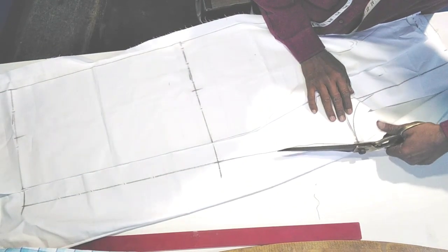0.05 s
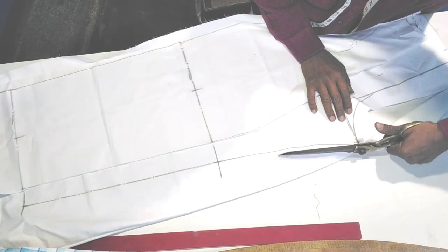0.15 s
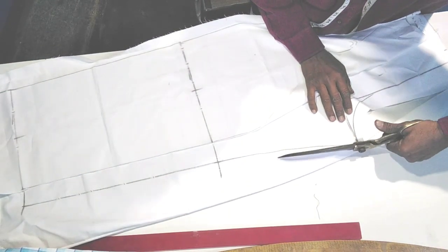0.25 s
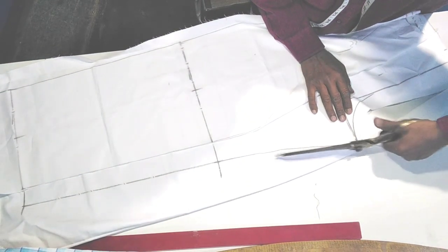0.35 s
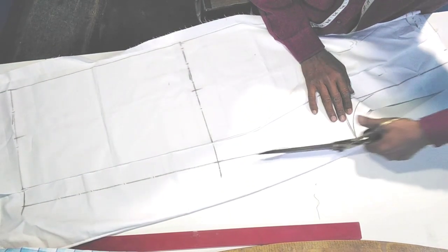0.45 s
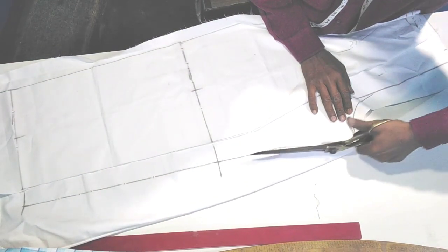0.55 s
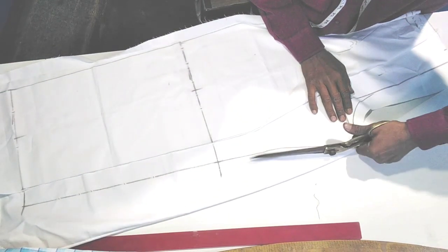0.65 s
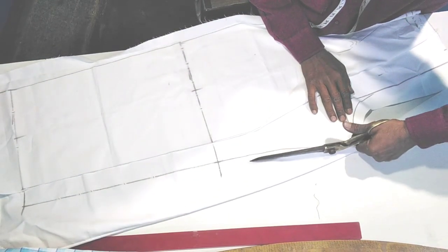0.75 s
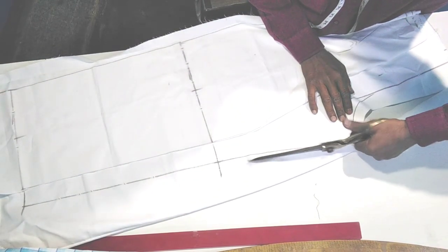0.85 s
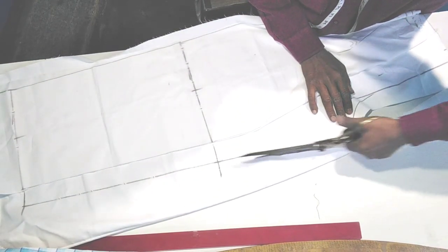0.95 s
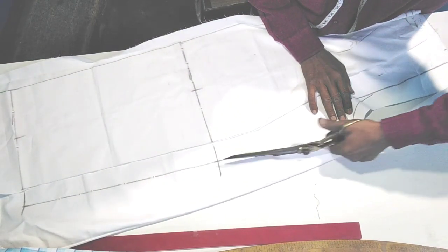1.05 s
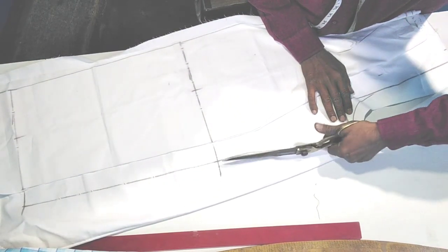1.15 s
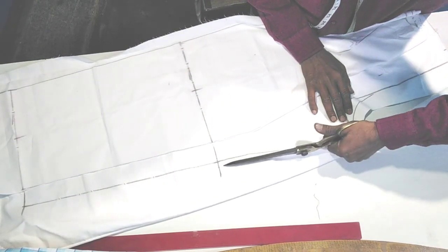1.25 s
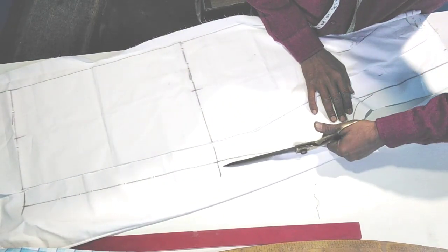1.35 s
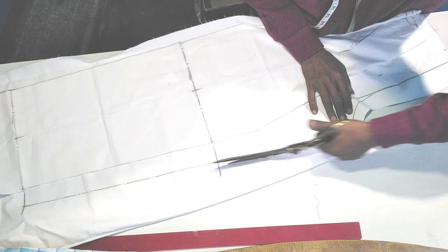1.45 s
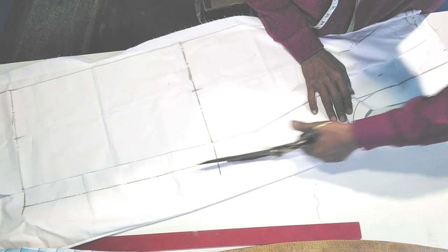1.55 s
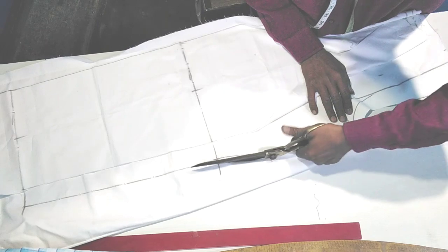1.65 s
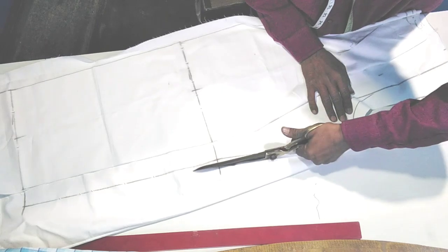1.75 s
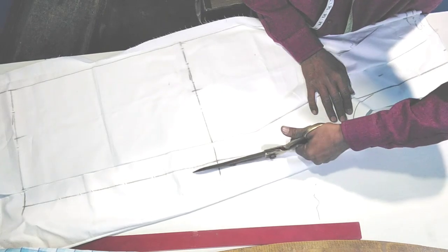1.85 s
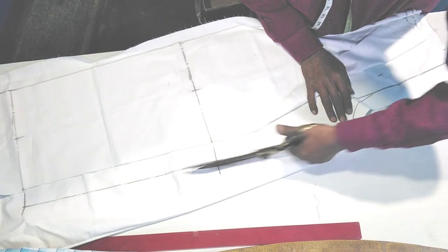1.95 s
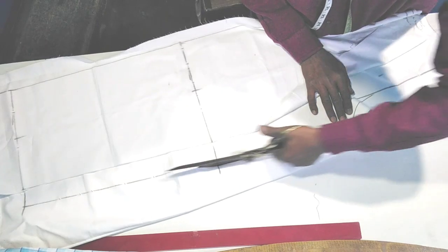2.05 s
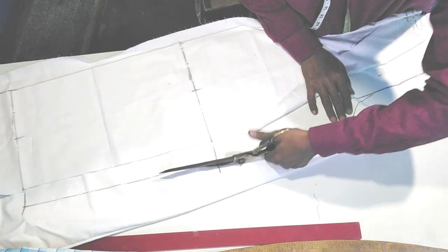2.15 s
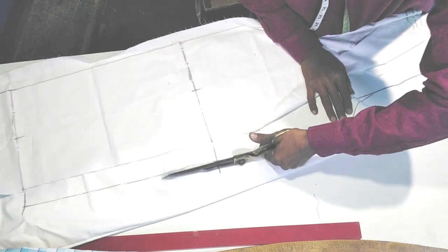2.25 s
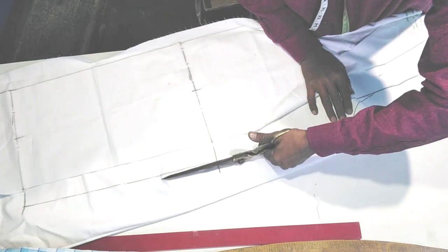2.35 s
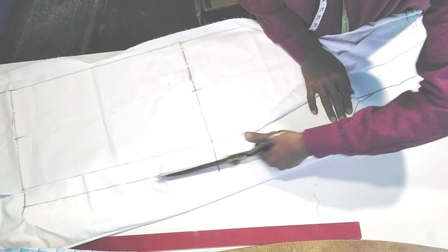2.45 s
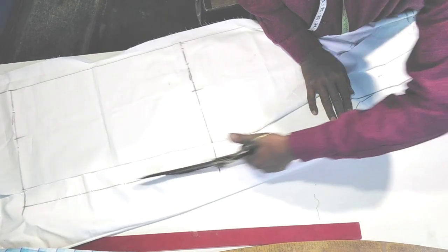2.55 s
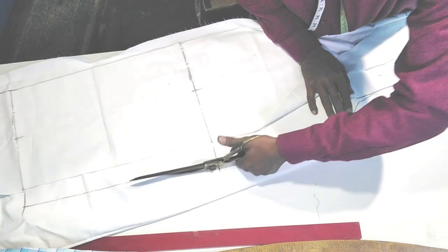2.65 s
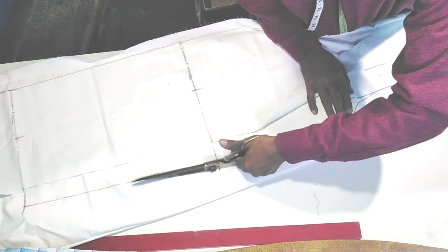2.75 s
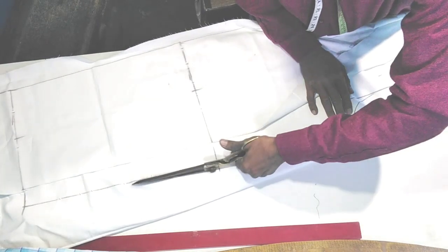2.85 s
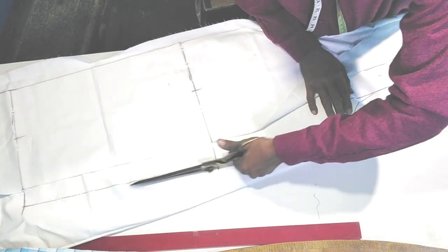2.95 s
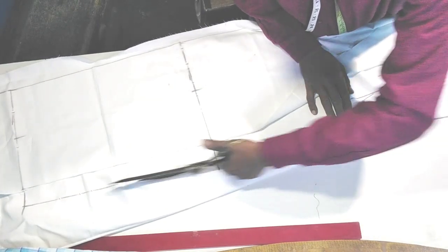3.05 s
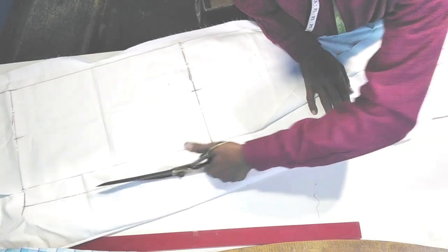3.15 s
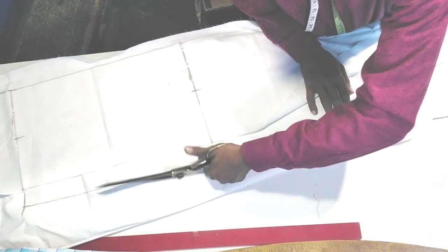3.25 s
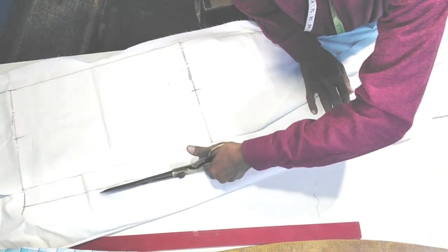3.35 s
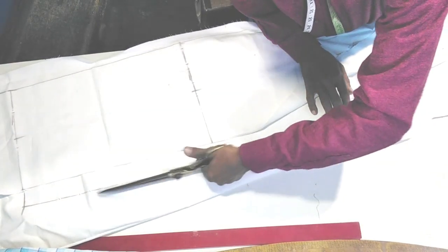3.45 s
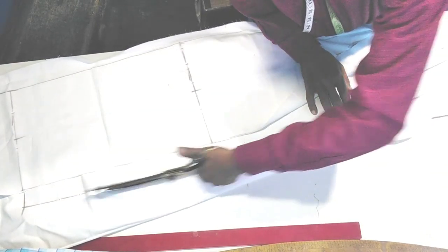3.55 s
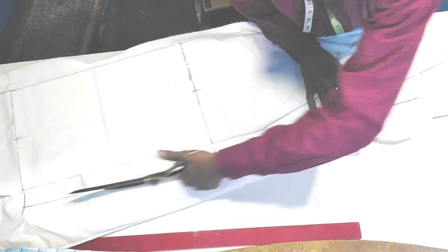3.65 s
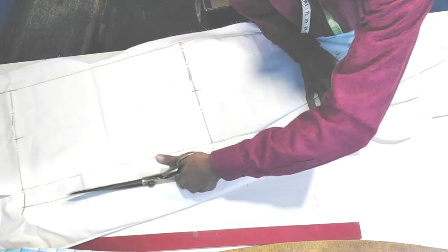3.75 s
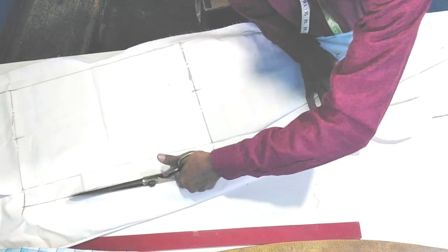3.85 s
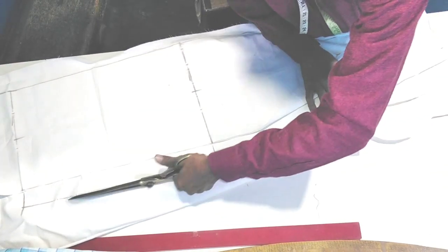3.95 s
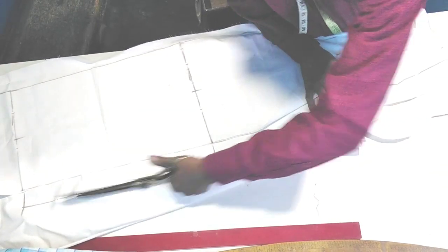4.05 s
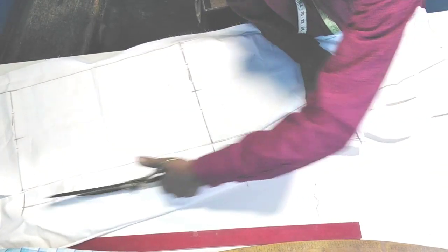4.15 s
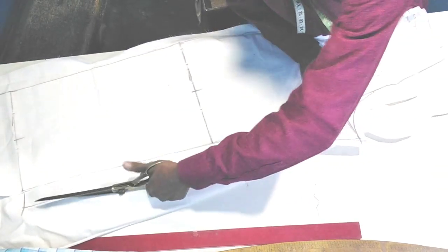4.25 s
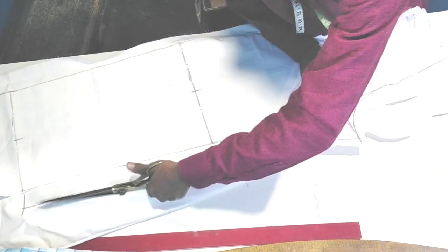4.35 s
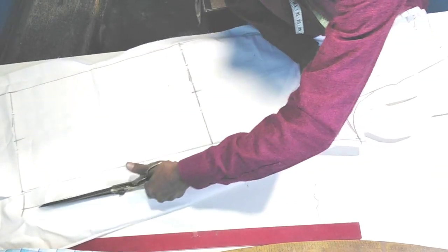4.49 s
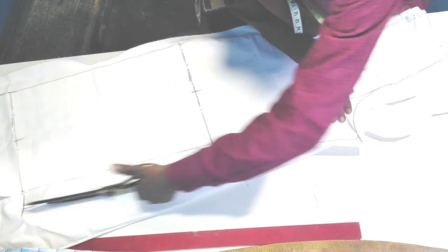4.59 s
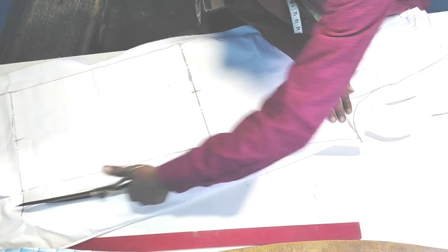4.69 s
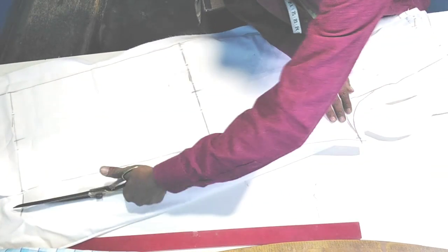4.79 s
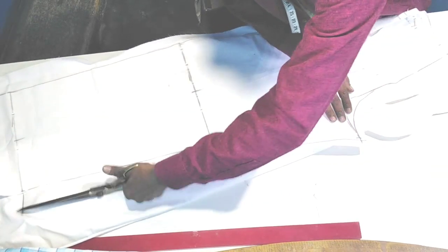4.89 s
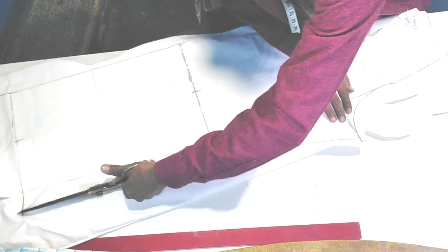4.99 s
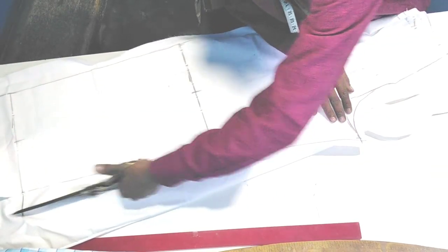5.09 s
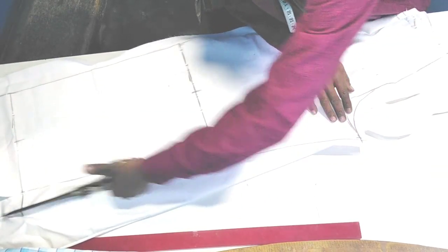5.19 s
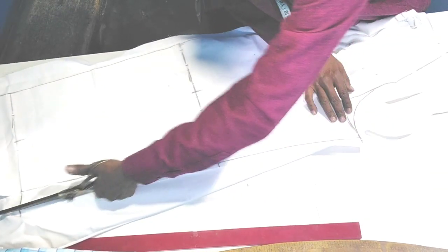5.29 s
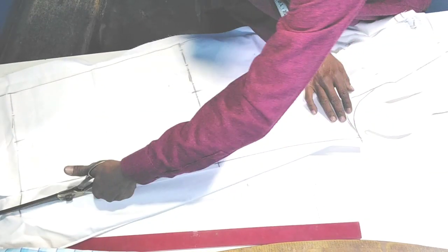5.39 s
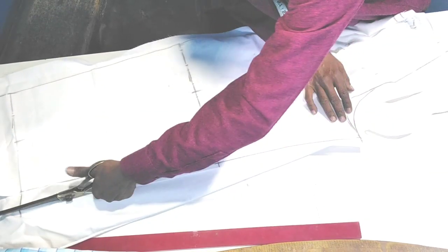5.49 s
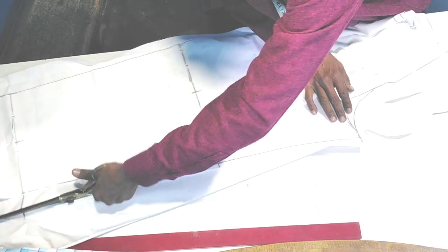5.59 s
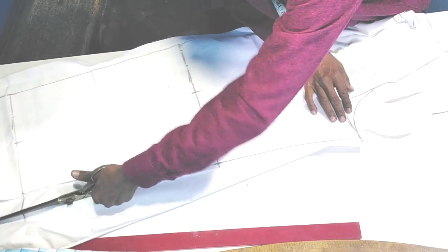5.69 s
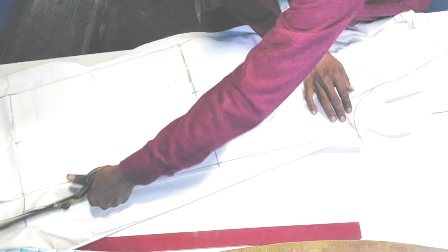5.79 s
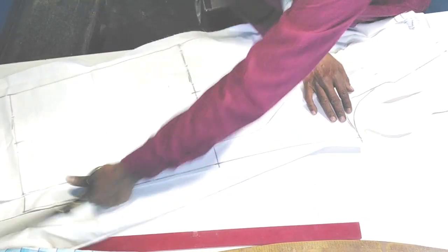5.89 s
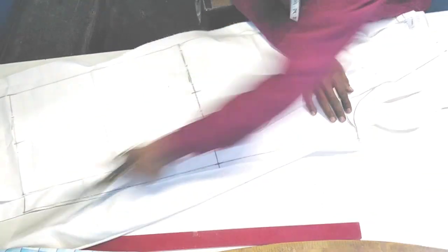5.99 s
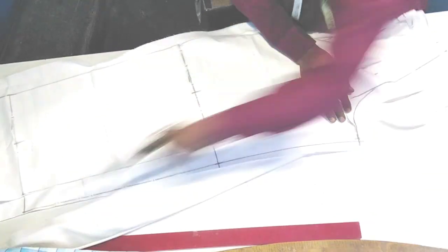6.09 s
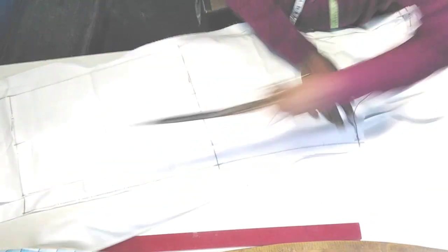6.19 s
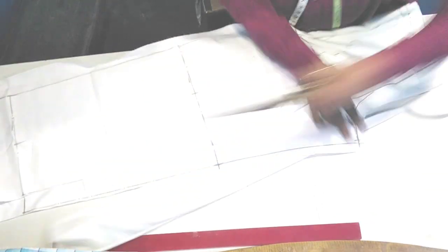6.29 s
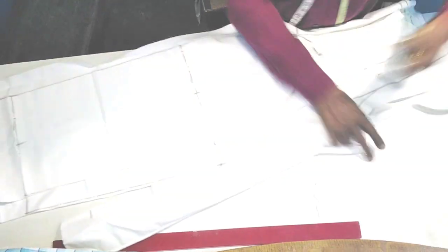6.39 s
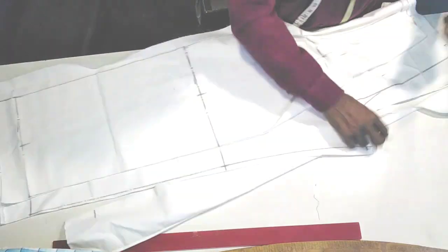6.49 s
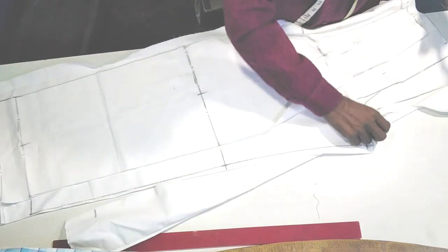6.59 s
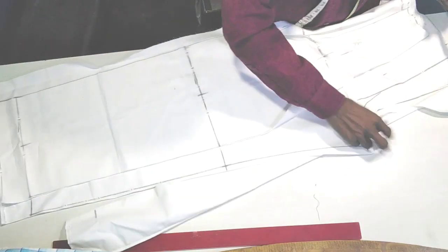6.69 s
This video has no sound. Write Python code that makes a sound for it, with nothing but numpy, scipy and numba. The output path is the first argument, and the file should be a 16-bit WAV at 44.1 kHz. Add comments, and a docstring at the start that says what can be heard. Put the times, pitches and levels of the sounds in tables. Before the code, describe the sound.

A steady low table hum and faint electrical whine lie under regular scissor strokes: knock, grinding crunch through fabric, steel click, opening scrape. The strokes resonate in the tabletop, heard from close by with a short dull room tail. Near the end a longer pause leads to a last snip, a loud double clack and skid, then swishing cloth and small metal ticks.

```python
"""Throughout, air murmurs, a lamp driver whines and ticks with the mains, a table hums and cloth rustles.
Large steel shears cut the cloth about twice a second: grains of noise, as of parting threads, excite
resonances of blades and table; knocks ring the table modes, tips clash and the blades scrape open.
At last the shears land hard, skid and leave the pivot ringing; they are drawn away as the rustle swells.
The sources are filtered noise, decaying modes and wavering sines; the shears also excite a short room tail."""
import sys
import numpy as np
from scipy import signal
from scipy.fft import rfft, irfft
from scipy.io import wavfile
from scipy.ndimage import uniform_filter1d
from numba import njit

SR = 44100
rng = np.random.default_rng(int(sys.argv[2]) if len(sys.argv) > 2 else 0)


def output_pcm(signal):
    """Save a mono or channel-first signal as 16-bit PCM at the path in sys.argv[1].

    Samples are clipped to [-1, 1] before scaling.
    """
    pcm = np.clip(np.atleast_2d(signal).T, -1, 1) * 32767
    wavfile.write(sys.argv[1], SR, np.round(pcm).astype(np.int16))


N = 296793
T = np.arange(N) / SR

# spectrum of the air, relative: [f/Hz, level/dB]
AIR_SPECTRUM = [(18, -33), (30, 0.5), (73, 3), (389, -14.5), (492, -34.5), (874, -17), (1080, -26),
                (1640, -29.5), (3230, -36.5), (9190, -107), (11900, -51), (14000, -34), (15500, -37)]
AIR_DB = -38.5  # mean rms level
# steady tones of the lamp driver: [f/Hz, level/dB]
WHINE = [(12726, -76), (12828, -80), (14228, -66), (14298, -82), (14330, -61.5), (14400, -74), (14433, -78),
         (14530, -74), (14632, -77), (14992, -69), (15106, -69), (15202, -65), (15289, -82), (15477, -75)]
MAINS_HZ, FIRST_TICK_S, TICK_DB = 49.945, 0.00529, -40
# lowest tone of the table, throughout: [t/s, f/Hz, level/dB]
HUM = [(0.0, 59.9, -24), (0.45, 60, -28.5), (0.51, 60.5, -39), (0.62, 61, -28), (0.8, 59.1, -29),
       (0.96, 58.5, -23), (1.42, 58.4, -31.5), (1.76, 61.1, -24), (1.97, 59.3, -47), (2.17, 59.3, -23.5),
       (2.74, 61, -35.5), (2.83, 59.6, -32), (3.71, 59.9, -27), (5.19, 60.4, -35.5), (5.45, 61.3, -36),
       (5.57, 62.9, -19), (5.62, 61.5, -28), (5.66, 61.7, -27), (5.77, 56.0, -30), (6.24, 54.4, -48),
       (6.35, 58.8, -37), (6.73, 58.6, -50)]
# swells of the two long modes above it: [peak t/s, second mode level/dB, third mode level/dB]
BOOM = [(0.2, -23.5, -28.5), (0.66, -24.5, -21.5), (1.201, -20, -26.5), (1.7, -26, -23), (2.25, -24.5, -31),
        (2.7, -23.5, -32), (3.3, -29.5, -45), (3.8, -24, -29.5), (4.36, -28, -36.5), (4.8, -28, -29),
        (5.34, -36.5, -43), (5.55, -29, -27), (5.67, -23, -23.5), (6.35, -35, -41.5)]
# those two modes: [f/Hz]
BOOM_HZ = 102.1, 154.9
SWELL_DB_PER_S, FADE_DB_PER_S, HALF_PLATEAU_S = 287, 81.5, 0.033
# cloth sliding: [t/s, fine hiss level/dB, swish level/dB, low rub level/dB, swish centre f/Hz]
RUSTLE = [(0.0, -59, -55, -49.5, 1500), (1.5, -57, -59, -51, 1550), (2.9, -57, -55, -61, 1550),
          (4.9, -59, -57.5, -52, 1370), (5.0, -61, -64, -78, 1503), (5.07, -63, -48, -49, 1900),
          (5.19, -53.5, -46.5, -50.5, 1830), (5.4, -68, -65, -82, 1624), (5.6, -66, -47, -52, 2500),
          (5.74, -55, -47, -50, 1400), (5.829, -58, -34.5, -39.5, 2800), (5.86, -59, -43.5, -44, 2430),
          (5.918, -50, -49.5, -48, 1432), (5.99, -45.5, -42.5, -44.5, 1290), (6.026, -43, -38.5, -44, 1230),
          (6.07, -44, -43, -50, 1304), (6.11, -45, -46, -49, 1900), (6.135, -48, -45.5, -39.5, 2200),
          (6.2, -48.5, -48.5, -53, 2130), (6.28, -49, -45, -45.5, 2280), (6.4, -50.5, -53.5, -50, 1870),
          (6.44, -46, -44.5, -46.5, 2200), (6.62, -55.5, -54.5, -55, 1800), (6.7, -47, -48.5, -47.5, 1740)]
SETTLE_DB, SETTLE_S = -41, 0.088  # the cut cloth rubs the table around each shutting of the blades
# closing strokes: [edges touch t/s, bite t/s, blades shut t/s, closing hiss level/dB,
# crunch through the table level/dB, rasp level/dB, first hiss level/dB, board f/Hz, mid-fall blade f/Hz]
SNIPS = [(0.051, 0.08, 0.18, -44, -16.5, -26.5, -47, 715, 8400),
         (0.599, 0.636, 0.71, -38.5, -14.5, -29.5, -47, 739, 7600),
         (1.126, 1.153, 1.237, -42, -14.5, -25, -47, 778, 7820),
         (1.659, 1.666, 1.778, -40.5, -16.5, -33, -49, 727, 7750),
         (2.173, 2.189, 2.289, -38, -14.5, -27.5, -50, 750, 8700),
         (2.68, 2.712, 2.82, -39, -18, -30, -49, 713, 9040),
         (3.176, 3.231, 3.328, -39.5, -17.5, -26.5, -52, 856, 9230),
         (3.732, 3.769, 3.838, -45, -14.5, -30.5, -48.5, 812, 9150),
         (4.249, 4.27, 4.38, -56, -15, -45, -49.5, 832, 9400),
         (4.768, 4.78, 4.88, -55, -17.5, -29.5, -47, 865, 9460),
         (5.418, 5.464, 5.517, -59, -17.5, -23, -50, 843, 9400)]
# shape of every closing stroke: [stage (0 touch, 1 bite, 2 shut), closing hiss level/dB,
# crunch level/dB, rasp level/dB, first hiss level/dB], added to the levels of the stroke
CLOSING_SHAPE = [(0, -22, -13, -10, -5), (0.8, -20, -6.5, -13, 0), (1, -18, -1, -5, -1.5),
                 (1.3, -13, -1.5, -2, 1), (1.75, 0, -3.5, -0.5, -6), (2, -3, -13, -7, -20)]
BLADE_SAG = 0.21  # fall of the blade resonance over a stroke, as a share
# skids after landing: [t/s, length t/s, hiss level/dB, crunch level/dB, rasp level/dB]
SKIDS = [(5.545, 0.055, -74, -36, -28), (5.66, 0.047, -61, -30, -49)]
# shape of every skid: [share of length, hiss level/dB, crunch level/dB, rasp level/dB]
SKID_SHAPE = [(0, -11, 1, 3), (1, -18, -13, -33)]
# shears or hand landing on the table: [t/s, thud level/dB, board level/dB]
KNOCKS = [(0.043, -12, -23.5), (0.56, -8.5, -26), (1.102, -12.5, -17.5), (1.625, -7.5, -21),
          (2.148, -8, -19.5), (2.662, -11, -19.5), (3.175, -17.5, -27), (3.714, -5, -28),
          (4.226, -14.5, -27), (4.768, -24, -14.5), (5.339, -22, -56), (5.529, -7, -13.5), (5.551, -3, -40),
          (5.643, 1.5, -12.5), (5.9, -16.5, -45), (6.131, -27, -36), (6.325, -31, -54), (6.354, -15.5, -40)]
PING_S, PING_DB = 5.6475, -9.5  # the hardest landing leaves the pivot ringing
# blade tips closing or landing: [t/s, burst level/dB, length t/s, brightest ring f/Hz, crack level/dB]
TIPS = [(0.224, -27.5, 0.013, 3180, -26), (0.725, -23, 0.029, 6640, -29.5),
        (1.2514, -16.5, 0.0084, 6600, -21), (1.587, -44, 0.01, 2952, -21), (1.6175, -29, 0.0085, 2980, -35),
        (1.7815, -22, 0.0091, 9520, -46), (2.141, -32, 0.01, 4960, -28), (2.301, -19, 0.02, 3350, -21.5),
        (2.659, -30, 0.0096, 3430, -37), (3.336, -25, 0.013, 3390, -34), (3.711, -27, 0.01, 2895, -24.5),
        (3.866, -15, 0.0086, 2930, -23), (4.224, -45, 0.01, 3340, -27.5), (4.386, -21, 0.013, 3390, -22.5),
        (4.868, -18.5, 0.019, 3150, -14), (4.891, -26.5, 0.014, 8820, -22), (4.918, -31, 0.0093, 9400, -24),
        (5.5277, -20, 0.01, 3200, 0.5), (5.632, -23, 0.0082, 3360, -17), (5.6397, -20, 0.014, 3117, -10),
        (6.283, -22, 0.0042, 4170, -26)]
# opening strokes: [t/s, length t/s, edge hiss level/dB, pivot scrape level/dB, board level/dB]
OPENINGS = [(0.335, 0.062, -33.5, -28.5, -22), (0.875, 0.06, -34.5, -35, -19.5),
            (1.405, 0.048, -30, -28.5, -19.5), (1.93, 0.042, -30, -40.5, -18),
            (2.445, 0.042, -36, -27, -19), (2.97, 0.037, -34, -24.5, -17.5),
            (3.48, 0.054, -33.5, -26.5, -20), (4.01, 0.038, -37.5, -23, -26),
            (4.53, 0.054, -43, -27.5, -27.5)]
# shape of every opening: [share of length, edge hiss level/dB, pivot level/dB, board level/dB]
OPENING_SHAPE = [(0, -22, -18, -0.5), (0.2, 3, -12, -2), (0.45, -4.5, -1, -3), (1, -25, -15.5, -9.5)]
# ticks of creasing cloth and touching steel: [t/s, peak level/dB, ring f/Hz]
CREASES = [(0.4793, -38, 4950), (0.9847, -38, 4060), (2.077, -36, 4270), (2.569, -50, 4140),
           (2.937, -33, 3525), (3.4144, -36, 4100), (3.4322, -39, 6210), (3.589, -35, 5920),
           (4.0679, -32, 3730), (5.0255, -39, 5870), (5.1814, -34, 3900), (5.222, -34.5, 5800),
           (5.273, -38, 5900), (5.363, -43, 5550), (6.0848, -28, 4050), (6.2358, -23, 4090),
           (6.255, -27, 4430), (6.2834, -12, 4130), (6.43, -38, 5150)]
CREASE_S = 0.00063  # time constant of decay
# modes of the table body: [f/Hz, 60 dB decay t/s, relative level/dB]
TABLE = [(71.4, 0.82, -14), (104, 0.049, 3.5), (139, 0.062, -10.5), (189.8, 0.22, -7.5), (238.2, 0.19, -7),
         (312.2, 0.089, -2.5), (367, 0.1, -3.5), (415, 0.05, -5), (527, 0.045, -14)]
# modes of the table top: [f/Hz, 60 dB decay t/s, relative level/dB]
TABLE_TOP = [(698, 0.02, 7.5), (864, 0.049, 6), (1330, 0.035, -10.5), (1473, 0.094, -4), (1677, 0.0067, -9),
             (2150, 0.17, -16)]
# modes of the steel blades: [f/Hz, 60 dB decay t/s, relative level/dB]
BLADES = [(2250, 0.0065, 10), (2740, 0.006, 4), (3326, 0.022, 10.5), (3658, 0.012, 12), (4250, 0.011, 1.5),
          (4840, 0.027, 3), (5770, 0.023, -36), (6860, 0.081, -2.5), (7750, 0.0069, -1), (8910, 0.015, 6),
          (9740, 0.0025, 9), (11000, 0.024, 0.5), (11500, 0.01, -16), (13600, 0.011, -1)]
# modes of the pivot: [f/Hz, 60 dB decay t/s, relative level/dB]
PIVOT = [(1434, 0.069, -2), (1608, 0.019, 3), (1983, 0.031, -5.5), (2640, 0.016, -12.5)]
ROOM_T60_S, ROOM_DB = 0.25, -12
TOP_HZ = 15550  # upper limit of the microphone


def undb(db):
    """Amplitude gain of a level in dB."""
    return 10 ** (np.asarray(db) / 20)


def unit(x):
    """Normalization to rms 1."""
    return x / np.sqrt(np.mean(x ** 2))


def walk(rate):
    """Random levels held 1 / rate s, then slewed by two running means; spread near 1."""
    k = int(SR / rate)
    held = np.repeat(rng.standard_normal(N // k + 1), k)
    return 1.51 * uniform_filter1d(uniform_filter1d(held, k), k)[:N]


def tone(hz, waver, rate):
    """Frequency modulation: a sine of rms 1 whose phase sums a wavering frequency."""
    cycles = np.cumsum(hz * (1 + waver * walk(rate))) / SR
    return np.sqrt(2) * np.sin(2 * np.pi * (cycles + rng.random()))


def grains(rate, spread_db, flicker_db):
    """Shot noise: dense clicks of uneven size, in gusts, as of threads parting or steel catching."""
    on = rng.random(N) < rate / SR
    sizes = rng.standard_normal(N) * undb(spread_db * rng.exponential(size=N))
    return unit(on * sizes * undb(flicker_db * walk(90)))


@njit
def svf(x, hz, q):
    """State-variable resonance: a band-pass whose centre may move every sample."""
    y, b, l = np.empty(len(x)), 0., 0.
    for i in range(len(x)):
        g = np.tan(np.pi * hz[i] / SR)
        v = (b + g * (x[i] - l)) / (1 + g * (g + 1 / q))
        b, l, y[i] = 2 * v - b, l + 2 * g * v, v / q
    return y


def band(x, hz, q):
    """Resonance selecting a band about a fixed or moving centre."""
    return svf(x, np.clip(hz, 20, .45 * SR) * np.ones(len(x)), 1. * q)


def ring(x, modes, patchy_db, rate):
    """Modal resonance: driven modes decay; the moving point of contact feeds each unevenly."""
    out = 0
    for k, (hz, t60, db) in enumerate(modes):
        r = np.exp(-np.log(1000) / (max(t60, .002) * SR))
        pole = r * np.exp(2j * np.pi * hz / SR)
        fed = x * undb(db + patchy_db * walk(rate))
        mode = np.sqrt(1 - r * r) * signal.lfilter([1], [1, -pole], fed).imag
        out = out + (-1) ** k * mode
    return out / np.sqrt(np.sum(undb(np.array(modes)[:, 2]) ** 2) / 2)


def stroke(stages, levels_db, shape, rise, fall):
    """Envelope: one dB shape stretched over the stage times of each stroke, ramped outside both ends."""
    out = np.zeros(N)
    for s, db in zip(stages, levels_db):
        stage = np.interp(T, s, np.arange(len(s)))
        ramp = np.clip(np.minimum((T - s[0]) / rise + 1, (s[-1] - T) / fall + 1), 0, 1)
        out += ramp ** 2 * undb(db + np.interp(stage, *shape))
    return out


def cut(column, rise, fall):
    """Envelope of one layer of the closing strokes."""
    rows = np.array(SNIPS)
    shape = np.transpose(CLOSING_SHAPE)[[0, column]]
    return stroke(rows[:, :3], rows[:, column + 2], shape, rise, fall)


def slide(rows, shape, column, rise, fall):
    """Envelope of one layer of sliding contacts, each given by its start and length."""
    rows, shape = np.transpose(rows), np.transpose(shape)
    stages = np.transpose([rows[0], rows[0] + rows[1]])
    return stroke(stages, rows[column + 1], shape[[0, column]], rise, fall)


def air():
    """Spectral shaping: stationary noise is weighted by frequency, and its level wavers a little."""
    hz = np.maximum(np.arange(N // 2 + 1) * SR / N, 1)
    f, db = np.transpose(AIR_SPECTRUM)
    shape = undb(np.interp(np.log(hz), np.log(f), db))
    murmur = unit(irfft(rfft(rng.standard_normal(N)) * shape, N))
    return murmur * undb(AIR_DB + 0.18 * walk(5.82))


def lamp():
    """Mains excitation: high tones, with an impulse of alternate sign at each half-cycle."""
    out = sum(undb(db) * tone(hz, waver=0.00035, rate=15) for hz, db in WHINE)
    times = np.arange(FIRST_TICK_S, N / SR - .01, 1 / (2 * MAINS_HZ))
    at = (times * SR).astype(int)
    out[at] += undb(TICK_DB + 2.5 * rng.standard_normal(len(at))) * (-1.) ** np.arange(len(at))
    return out


def boom():
    """Low modes: the lowest tone of the table hums on while two above swell and fade exponentially."""
    s, hz, db = np.transpose(HUM)
    out = undb(np.interp(T, s, db)) * tone(np.interp(T, s, hz), waver=0.0358, rate=20)
    peak, *dbs = np.transpose(BOOM)[:, :, None]
    before = np.maximum(peak - HALF_PLATEAU_S - T, 0)
    after = np.maximum(T - peak - HALF_PLATEAU_S, 0)
    swell_db = -SWELL_DB_PER_S * before - FADE_DB_PER_S * after
    for f, db in zip(BOOM_HZ, dbs):
        gain = undb((db + swell_db).max(axis=0))  # the strongest swell prevails
        out = out + gain * tone(f * np.ones(N), waver=0.039, rate=20)
    return out


def rustle():
    """Friction noise: cloth slides over cloth in a fine patchy hiss, a swish and a duller rub."""
    s, *dbs, swish_hz = np.transpose(RUSTLE)
    fine, airy, mid, low = (grains(rate=rate, spread_db=1.5, flicker_db=1.54)
                            for rate in (12300, 14400, 8170, 4135))
    hiss = band(band(fine, 4200, q=0.74), 4200, q=0.74)
    hiss = hiss + 1.1 * band(fine, 4420, q=8.7) + 0.7 * band(airy, 7100, q=0.86)
    swish = band(band(mid, 1400, q=1.0), 1740, q=0.94)
    swish = swish + 1.1 * band(mid, np.interp(T, s, swish_hz), q=7.8)
    rub = band(band(low, 410, q=0.65), 410, q=0.65)
    settle = sum(np.exp(-np.abs(T - row[2]) / SETTLE_S) for row in SNIPS)
    out = unit(rub) * undb(SETTLE_DB) * settle
    for layer, db in zip((hiss, swish, rub), dbs):
        out = out + unit(layer) * undb(np.interp(T, s, db))
    return out


def snips():
    """Forced vibration: parting threads, and later skids, shake the blades and through them the table."""
    touch, _, shut, *_, board_hz, blade_hz = np.transpose(SNIPS)
    ends = np.transpose([touch, shut]).ravel()
    board_hz = np.interp(T, ends, np.repeat(board_hz, 2))
    sagging = np.outer(blade_hz, [1 + BLADE_SAG / 2, 1 - BLADE_SAG / 2]).ravel()
    blade_hz = np.interp(T, ends, sagging)

    def scraped(column):
        gain = cut(column, 0.0053, 0.0045) + slide(SKIDS, SKID_SHAPE, column, 0.005, 0.01)
        return grains(rate=9000, spread_db=2.0, flicker_db=3.0) * gain

    edge, rasp = scraped(1), scraped(3)
    first_hiss = cut(column=4, rise=0.0035, fall=0.004)
    edge = edge + grains(rate=7000, spread_db=2.0, flicker_db=4.0) * first_hiss
    # the free length of blade changes as it closes, so two resonances move and waver
    moving = 4.25 * band(band(edge, blade_hz * (1 + 0.034 * walk(40)), q=5.3), blade_hz, q=2.0)
    moving = moving + 1.4 * band(edge, 0.788 * blade_hz * (1 + 0.051 * walk(23)), q=21.0)
    steel = moving + 0.8 * ring(edge, BLADES[6:], patchy_db=3.5, rate=55)
    steel = steel + 0.38 * ring(rasp, BLADES[:6], patchy_db=2.0, rate=25)
    steel = steel + 0.85 * band(band(rasp, 2720, q=1.3), 2740, q=1.1)

    gain = cut(column=2, rise=0.024, fall=0.061)
    gain = gain + slide(SKIDS, SKID_SHAPE, column=2, rise=0.0077, fall=0.027)
    push = grains(rate=4000, spread_db=1.0, flicker_db=3.0) * gain
    board = 6.23 * band(band(push, board_hz, q=7.36), board_hz, q=1.0) + 1.0 * band(push, 613, q=3.7)
    board = board + 0.72 * ring(push, TABLE[3:], patchy_db=0.05, rate=17)
    return steel + board + 0.47 * ring(push, TABLE_TOP, patchy_db=1.5, rate=27)


def knocks():
    """Impact: a soft push excites the low table modes, a short chatter the board, each at another spot."""
    out, t = np.zeros(N + SR), np.arange(SR // 2) / SR
    spots = rng.standard_normal((len(KNOCKS), 2, len(TABLE)))
    chatter = rng.standard_normal((len(KNOCKS), SR // 125)) * np.hanning(SR // 125)  # 8 ms
    soft = np.hanning(int(0.0037 * SR))
    for (s, *dbs), spot, rough in zip(KNOCKS, spots, chatter):
        for modes, db, push, chance in zip((TABLE, TABLE_TOP), dbs, (soft, rough), spot):
            blow = 0
            for (hz, t60, g), c in zip(modes, chance):
                blow = blow + undb(g + 1.9 * c) * np.sin(2 * np.pi * hz * t) * 1000. ** (-t / t60)
            blow = signal.fftconvolve(blow, push)[:len(t)]
            out[int(s * SR):][:len(t)] += undb(db) * blow / np.abs(blow).max()
    hz, t60, _ = PIVOT[0]
    blur = unit(band(rng.standard_normal(len(t)), hz, q=8.6))
    ping = np.sin(2 * np.pi * hz * t) + 0.53 * blur
    envelope = (1 - np.exp(-t / 0.00047)) * 1000. ** (-t / t60)
    out[int(PING_S * SR):][:len(t)] += undb(PING_DB) * envelope * ping
    return out[:N]


def tips():
    """Impact of steel on steel: a burst excites the blades, one ring standing out, over a duller crack."""
    rub, bright, crack = np.zeros(N), np.zeros(N), np.zeros(N)
    for s, db, length, hz, crack_db in TIPS:
        i, n = int(s * SR), max(int(length * SR), 20)
        burst = np.sqrt(np.hanning(n)) * rng.standard_normal(2000)[:n]
        rub[i:i + n] += undb(db) * burst
        crack[i:i + n] += undb(crack_db) * burst
        bright[i:i + 4 * n] += undb(db) * band(np.pad(burst, (0, 3 * n)), hz, q=23.0)
    blades = 0.13 * ring(rub, BLADES[2:], patchy_db=3.0, rate=6.7)
    return blades + 1.3 * bright + 0.93 * band(band(crack, 1550, q=1.0), 1550, q=1.0)


def openings():
    """Sliding friction: the parting blades scrape, exciting the steel, the pivot and the board."""
    rub = grains(rate=9000, spread_db=3.5, flicker_db=1.0)
    edge, pivot, board = (rub * slide(OPENINGS, OPENING_SHAPE, column=c, rise=0.018, fall=0.017)
                          for c in range(1, 4))
    steel = 0.2 * ring(edge, BLADES[2:], patchy_db=5.0, rate=40) + 0.44 * band(edge, 5900, q=1.4)
    joint = 0.62 * ring(pivot, PIVOT[1:], patchy_db=3.5, rate=40) + 1.5 * band(pivot, 1400, q=2.5)
    wood = 2.43 * band(board, 684, q=5.3) + 0.18 * ring(board, TABLE[5:], patchy_db=0.5, rate=13.0)
    return steel + joint + wood


def creases():
    """Damped oscillation: each tick of cloth or steel is a few cycles of a decaying sine."""
    out, t = np.zeros(N), np.arange(SR // 50) / SR
    for s, db, hz in CREASES:
        tick = np.sin(2 * np.pi * hz * t) * np.exp(-t / CREASE_S)
        out[int(s * SR):][:len(t)] += undb(db) * tick
    return out


def room(x):
    """Reverberation: convolution with a short dull tail of exponentially decaying noise."""
    t = np.arange(SR // 2) / SR
    dull = band(band(rng.standard_normal(len(t)), 1110, q=0.26), 757, q=0.29)
    tail = dull * 1000. ** (-t / ROOM_T60_S) * (t > .004)
    return undb(ROOM_DB) * signal.fftconvolve(x, tail / np.sqrt(np.sum(tail ** 2)))[:N]


def scene():
    """Superposition of air, lamp, table tones, cloth and the shears with their reflections."""
    shears = snips() + knocks() + tips() + openings()
    return (air() + lamp() + boom() + rustle() + shears + creases() + room(shears))[None]


def record(dry):
    """Band limiting and saturation: the microphone drops deep bass, rounds loud peaks and cuts the top."""
    dry = signal.sosfilt(signal.butter(6, 44, "high", fs=SR, output="sos"), dry)
    dry = np.tanh(.8 * dry) / .8
    return signal.sosfilt(signal.ellip(10, .2, 60, TOP_HZ, fs=SR, output="sos"), dry)


dry = scene()
out = record(dry)
output_pcm(out)
```